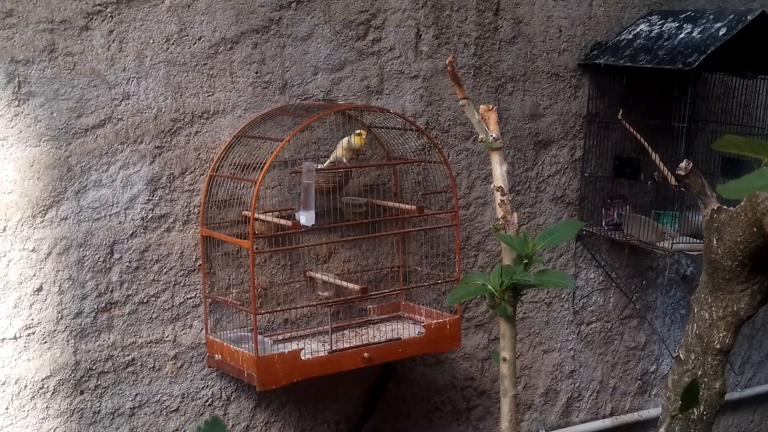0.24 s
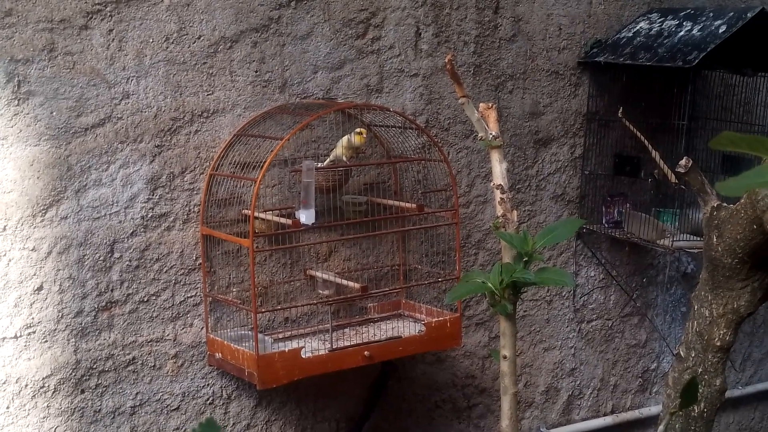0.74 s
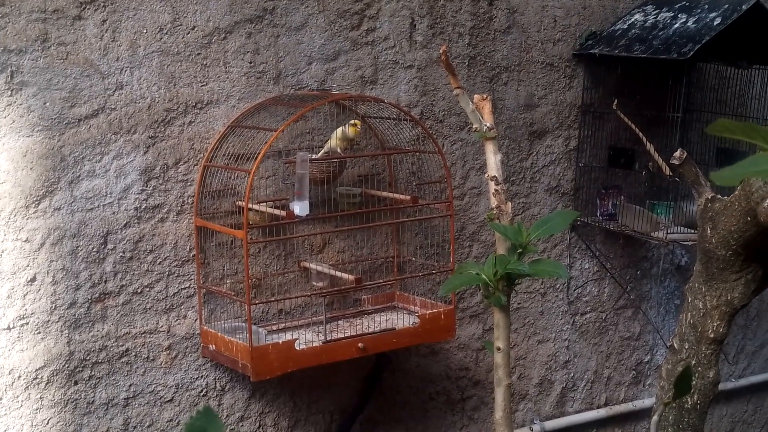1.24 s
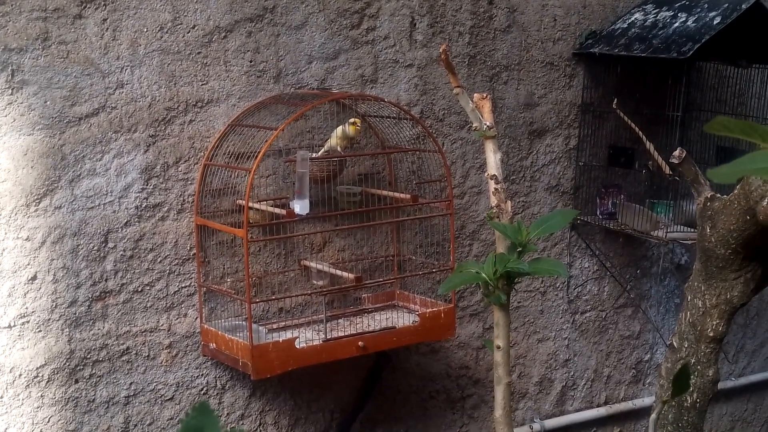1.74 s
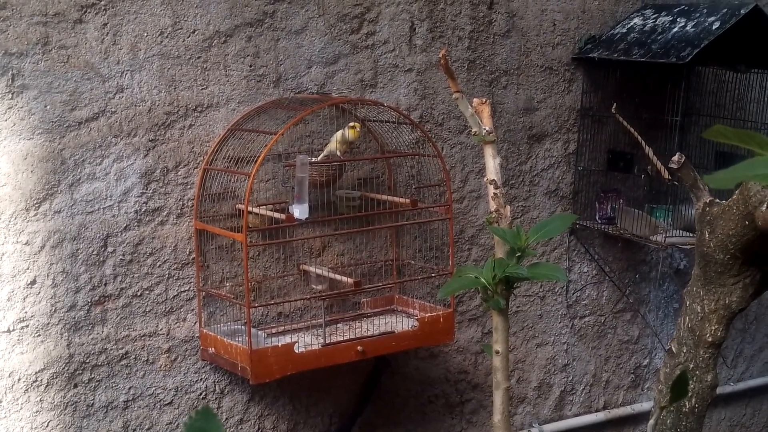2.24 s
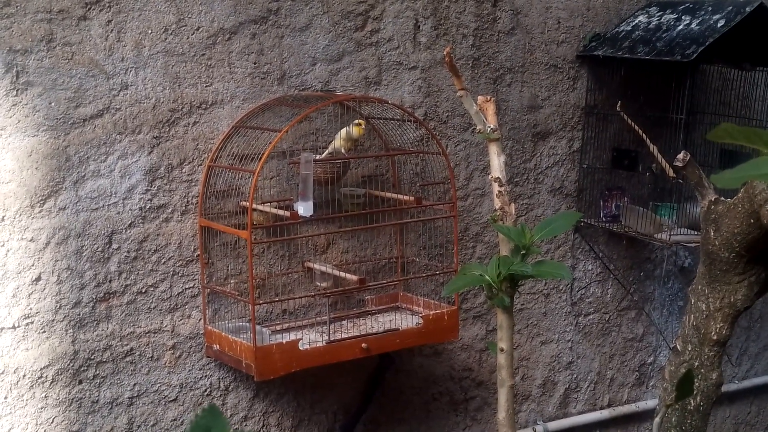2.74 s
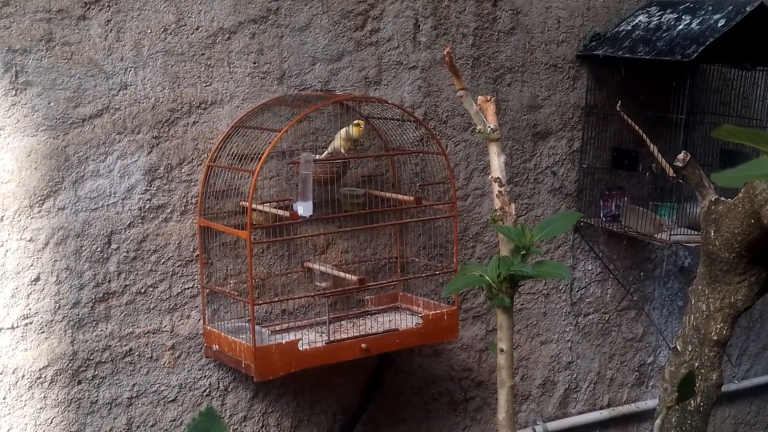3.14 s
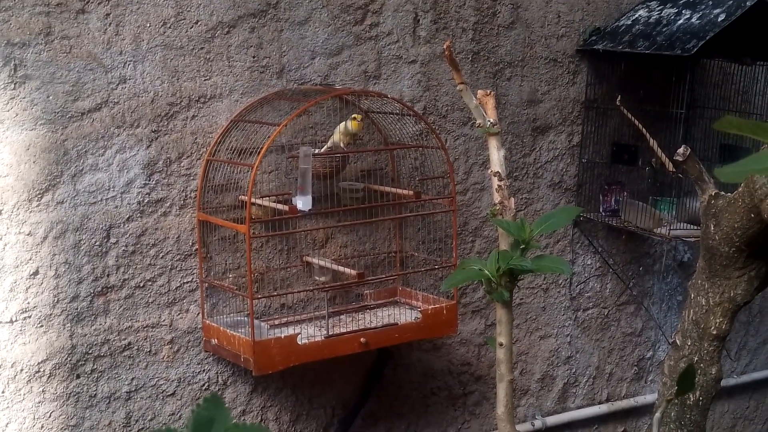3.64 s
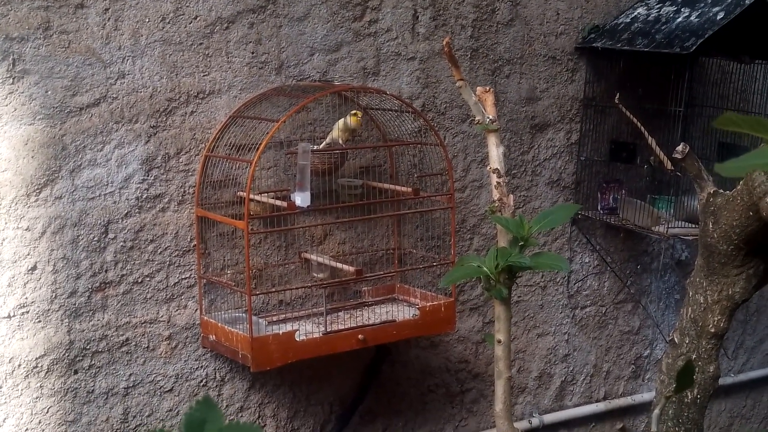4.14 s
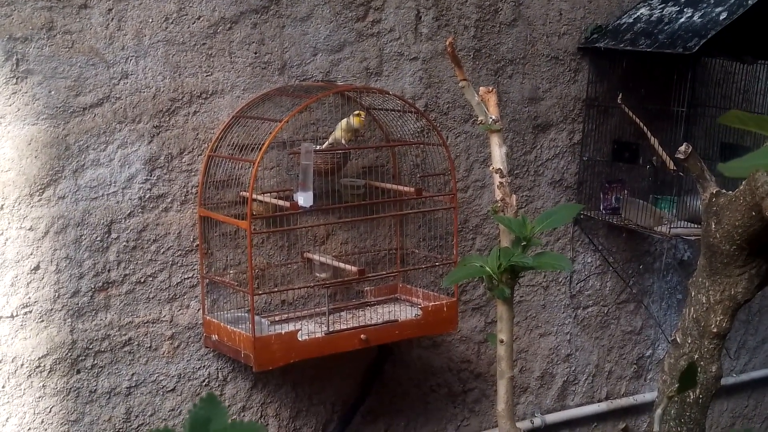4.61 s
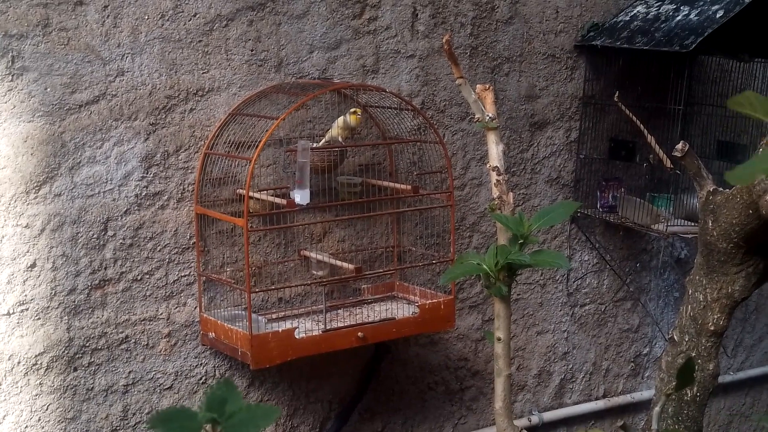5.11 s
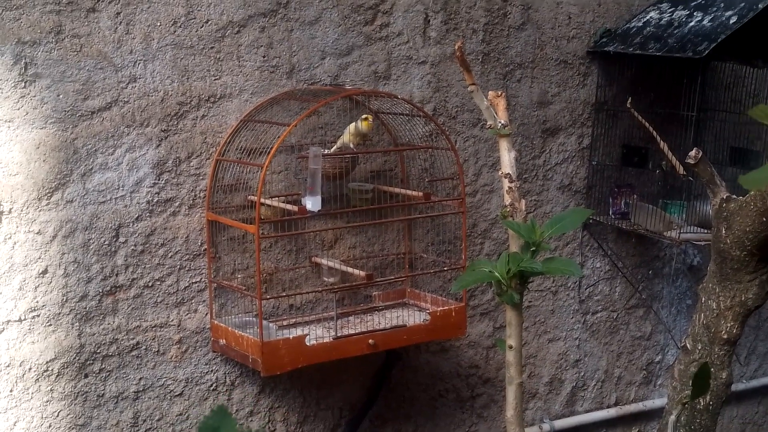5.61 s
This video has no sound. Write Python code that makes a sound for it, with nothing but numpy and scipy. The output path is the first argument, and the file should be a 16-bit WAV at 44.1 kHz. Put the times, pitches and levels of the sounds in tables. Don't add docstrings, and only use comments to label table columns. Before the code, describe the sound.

A walled yard with caged birds, heard in stereo by a small camera with uneven left and right ports. From 0 to 1 s a finch gives soft falling pips and a dry rattle, a dove coos long and low, and a far sparrow cheeps. From 1 to 2.5 s a second canary throws steep bright chirps and fading slides, with level whistles between. From 2.05 to 2.9 s the main canary clicks about seven times a second, each with a hoarse low tail. At 3.1 s it bursts into a trill of about twenty falling whistles a second, then from 3.95 s a slower roll of some eight or nine two-step drops a second. Two steep notes at 5.5 s and a falling slide at 5.7 s close it. Coos return near 1.9, 2.9, 4.2 and 5.6 s. Short wall echoes, blurred distant birdsong, town hum, street swishes and low wind taps on the right remain faint.

```python
import sys
import numpy as np
from scipy import signal
from scipy.fft import rfft, irfft, next_fast_len
from scipy.io import wavfile
from scipy.ndimage import uniform_filter1d, minimum_filter1d, map_coordinates

SR = 44100
rng = np.random.default_rng(int(sys.argv[2]) if len(sys.argv) > 2 else 0)


def invert_db(level):
    return 10 ** (np.asarray(level, dtype=float) / 20)


def wav_record(signal):
    frames = np.transpose(np.atleast_2d(signal))
    bounded = np.clip(frames, -1, 1)
    quanta = np.round(bounded * 32767).astype(np.int16)
    wavfile.write(sys.argv[1], SR, quanta)


N = 258867

# t/s, level/dB
WIND_GUSTS = [(0.0, -82.5), (0.23, -72), (0.29, -83.5), (2.39, -70), (3.35, -75.5), (3.42, -71.5),
              (4.051, -96.5), (4.46, -73), (4.56, -77), (4.9, -62), (5.03, -75.5), (5.07, -66), (5.3, -86),
              (5.49, -73), (5.56, -74.5), (5.87, -73.5)]
# t/s, peak level/dB
WIND_TAPS = [(0.696, -76), (1.316, -56.5), (1.4, -52), (1.434, -52), (1.6, -50.5), (1.826, -51.5),
             (1.955, -37), (2.201, -37), (2.256, -38.5), (2.313, -47.5), (2.363, -43.5), (2.405, -49),
             (2.532, -48.5), (2.582, -52), (2.675, -51), (2.748, -56), (3.368, -43.5), (3.466, -48.5),
             (4.429, -48), (4.773, -39.5), (4.866, -39), (4.916, -46), (5.064, -35), (5.093, -43),
             (5.472, -36.5)]
# f/Hz, level/dB
TAP_COLOUR = [(100, -7), (190, -10.5), (260, 12), (420, -1.5), (800, -19.5), (1200, -54), (3000, -59)]
# f/Hz, level/dB per Hz
BUFFET_COLOUR = [(12, -64), (20, -19), (81, -0.5), (127, -5), (166, -19), (217, -4), (265, -1),
                 (392, -12.5), (455, -25), (500, -36), (650, -84), (1100, -120)]
TOWN_COLOUR = [(120, -54), (200, -20), (242, -24.5), (474, -10), (901, -16.5), (1600, -19.5), (2030, -2),
               (2200, -9), (2860, 1), (4840, -120)]
CHATTER_COLOUR = [(940, -54), (1600, -24), (2090, -13.5), (2450, -3), (2940, -15), (3110, -9.5),
                  (4180, -17), (5610, -23.5), (6870, -28.5), (8600, -31), (10700, -35.5), (13800, -34.5),
                  (14600, -82.5)]
# middle t/s, half length/s, centre f/Hz, width/Hz, level/dB
STREET_SWISHES = [
    (0.543, 0.46, 1380, 496, -71.5),
    (2.614, 0.31, 940, 396, -70),
    (3.133, 0.039, 1570, 200, -58.5),
    (4.195, 0.096, 1010, 400, -58),
    (4.198, 0.11, 1810, 400, -48.5),
    (5.059, 0.13, 860, 410, -49.5),
    (5.197, 0.22, 1510, 200, -61),
    (5.393, 0.19, 677, 189, -65.5),
]

# t/s, length/s, start f/Hz, level/dB
SPARROW_CHEEPS = [(.0005, 0.012, 6760, -34.5), (0.008, 0.0035, 4130, -39), (0.114, .04, 6700, -47),
                  (0.976, .04, 6440, -44), (1.294, 0.05, 6000, -48), (1.557, .042, 5990, -38),
                  (1.801, 0.0087, 4910, -52), (1.987, 0.016, 3740, -48), (2.052, 0.0294, 5970, -38),
                  (3.503, .054, 7310, -34.5), (4.32, 0.021, 7890, -43), (4.78, 0.023, 7790, -36.5)]
# t/s, length/s, start f/Hz, end f/Hz, level/dB
FAR_GLIDES = [
    (1.86, 0.091, 3740, 4400, -48),
    (2.781, .14, 4270, 3820, -46),
    (3.201, 0.13, 3820, 2674, -49),
    (3.301, 0.094, 4224, 3710, -35.5),
    (3.47, 0.11, 1772, 2200, -47),
    (3.57, 0.087, 2200, 2110, -43),
    (3.45, 0.13, 3550, 2830, -47.5),
    (3.685, 0.12, 4160, 3040, -38.5),
    (3.79, 0.055, 3184, 2990, -40),
    (5.251, 0.036, 3376, 3053, -43.5),
]
# t/s, length/s, f/Hz, level/dB
FAR_HELD = [(.73, .05, 2870, -58), (2.607, 0.046, 7080, -44), (2.906, 0.034, 7030, -42.5),
            (3.521, 0.042, 625, -51.5), (3.899, 0.072, 656, -70), (4.134, 0.091, 687, -60.5),
            (4.385, 0.044, 1990, -52), (4.561, 0.043, 671, -57), (5.474, .17, 4424, -34),
            (5.664, 0.011, 6520, -36.5), (5.669, 0.012, 9420, -55), (3.06, 0.054, 3850, -46)]
# t/s, level/dB
FAR_TICK_TIMES = [(.474, -66), (.523, -63), (.572, -65), (.621, -61), (.671, -64), (.719, -66), (.766, -60),
                  (.816, -56), (.865, -63)]
# t/s, length/s, level/dB; then its pitch arc, f/Hz
SINKING_CALL = (5.061, .6, -55)
SINKING_PITCH = [785, 804, 671, 620]

# t/s, length/s, top f/Hz, share of the coo before the top, level/dB
DOVE_COOS = [
    (0.096, 0.86, 569.3, 0.68, -52),
    (1.863, 0.41, 349.3, 0.29, -50.5),
    (2.9, 0.54, 376, 0.337, -49.5),
    (4.209, 0.56, 384.5, 0.316, -49.5),
    (5.557, 0.35, 370, 0.38, -49),
]

# first t/s, gap/s, count, length/s
PIP_SERIES = [
    (.03, .07, 4, .02),
    (.758, .086, 6, .03),
]
# start f/Hz, end f/Hz
PIP_PITCH = [(2674, 1830), (2160, 1926)]
PIP_LEVEL = [-35, -42.5]
# t/s, peak level/dB; then the pitch path of a tick, f/Hz
RATTLE_TICKS = [(0.3001, -36), (0.3368, -40.5), (0.3736, -37), (0.4072, -42), (0.438, -39), (0.4754, -38),
                (0.5152, -38.5), (0.5494, -40), (0.585, -37.5), (0.6214, -39.5), (0.665, -45), (0.7, -44.5)]
RATTLE_PITCH = [2926, 1940, 1010]

# t/s, length/s, start f/Hz, end f/Hz, level/dB
CLEAR_CALLS = [
    (3.91, 0.083, 2930, 4010, -38.5),
    (4.08, 0.2, 2030, 4580, -34.5),
    (4.39, .035, 7000, 5500, -31),
    (4.435, 0.06, 4750, 3760, -36.5),
    (5.72, 0.084, 4600, 4575, -40),
]
# t/s, length/s, start f/Hz, end f/Hz, level/dB
BRIGHT_WARBLE = [
    (5.52, 0.12, 4320, 4630, -32.5),
    (5.575, 0.062, 4720, 4630, -32.5),
]
# t/s, length/s, f/Hz, level/dB
LEVEL_WHISTLES = [
    (1.339, 0.14, 2522, -36),
    (1.577, .16, 2487, -37),
    (1.848, 0.051, 2497, -37.5),
    (1.912, 0.08, 2450, -36.5),
]
# t/s, length/s, level/dB; then its pitch arc, f/Hz
HOOKED_NOTE = (.42, 0.11, -40)
HOOKED_PITCH = [5330, 6530, 6360, 6420, 5880]

# t/s, length/s, pitch f/Hz at even steps, level/dB
SECOND_CHIRPS = [
    (0.176, 0.036, [7500, 6720, 6050, 5200], -17),
    (1.273, 0.036, [8290, 6750, 6280, 4480], -10.5),
    (1.52, 0.025, [7930, 6750, 6520, 5140], -4.5),
    (1.783, 0.032, [7530, 6450, 5965, 4400], -9.5),
]
# t/s, length/s, start f/Hz, end f/Hz, level/dB
CHIRP_TRAILS = [
    (1.304, 0.037, 5750, 5140, -26),
    (1.551, .048, 6290, 4400, -32.5),
    (2.056, 0.0414, 7800, 4960, -35),
    (2.236, .034, 5400, 5130, -37),
    (.971, 0.033, 7300, 4800, -31),
    (.217, 0.0115, 4900, 3000, -27),
    (1.8, 0.051, 6200, 7200, -48),
]
# t/s, length/s, end f/Hz, level/dB
HIGH_SLIDES = [
    (.9541, 0.11, 3080, -29),
    (1.1231, 0.086, 3250, -28),
    (1.4041, 0.071, 3500, -26.5),
    (1.6787, 0.08, 3180, -29),
    (1.917, 0.059, 4490, -28),
    (2.16, .06, 3380, -31),
    (2.2754, 0.11, 2394, -30.5),
    (2.405, 0.14, 2030, -30),
]
LOW_SLIDES = [
    (2.646, .12, 4146, -30),
    (2.948, 0.22, 3710, -34),
]

# t/s, level/dB, level of the lower slide/dB
CANARY_CLICKS = [
    (2.05, -23.5, -31.5),
    (2.193, -22, -29),
    (2.334, -17.5, -27.5),
    (2.475, -20.5, -28),
    (2.619, -22, -29),
    (2.766, -20.5, -26.5),
    (2.914, -22, -27),
]
CLICK_DROP_PITCH = [4350, 3340, 2480]
# t/s, length/s, start f/Hz, end f/Hz, level/dB
LINK_NOTES = [
    (.077, .0065, 6740, 3060, -28.5),
    (.1485, .007, 6570, 3440, -28.5),
]
# t/s, length/s, level/dB; then pitch f/Hz at even steps
TRILL_NOTES = [(3.1128, 0.014, -18.5), (3.1588, 0.015, -13.5), (3.2085, 0.023, -14.5), (3.2571, 0.023, -13),
               (3.3089, 0.025, -13), (3.3596, 0.023, -10), (3.4153, .025, -10.5), (3.468, 0.023, -11),
               (3.5218, 0.023, -12), (3.573, 0.023, -14), (3.6242, .025, -15.5), (3.6781, 0.026, -14),
               (3.7344, 0.023, -14), (3.787, 0.03, -12.5)]
TRILL_PITCH = [7320, 5960, 4800, 3760]
# t/s, length/s, level/dB; then pitch f/Hz at even steps
LEAD_NOTE = [
    (3.8444, 0.06, -15),
]
LEAD_PITCH = [7695, 6450, 5670, 4220]
# t/s, time to shoulder/ms, to knee/ms, to last bead/ms, level/dB
ROLL_NOTES = [(3.9487, 30, 50.8, 59, -11.5), (4.067, 32, 52.7, 67, -13), (4.1997, 23, 47.6, 57, -13.5),
              (4.331, 22, 42, 54, -14.5), (4.439, 31, 49.3, 64, -12.5), (4.5508, 28.5, 50.7, 58.7, -12.5),
              (4.67, 29, 53, 64, -11.5), (4.7826, 25.3, 46.8, 65, -11), (4.9, 26.2, 45, 61.6, -11),
              (5.018, 30.5, 45.3, 60.7, -12), (5.136, 27.3, 51.4, 63, -11.5), (5.261, 26.2, 46, 55, -10.5),
              (5.3814, 29.7, 50.6, 61.4, -12.5)]
ROLL_FACING = [0, 5, -5.5, -1, 2.5, 4, 3.5, -4, -11, 1, -4, -3.5, -1.5]
ROLL_PITCH = [8190, 6520, 6120, 5640, 5107, 4736, 3850, 2575]
# t/s, length/s, level/dB; then pitch f/Hz at even steps
END_NOTES = [
    (5.504, .042, -16.5),
    (5.576, 0.036, -17.5),
]
END_PITCH = [7500, 5500, 4580, 3570]
# t/s, length/s, pitch f/Hz at even steps, level/dB, rise share, fall share
CLOSING_SLIDE = [
    (5.676, 0.069, [4600, 3950, 2700], -16.5, 0.42, 0.72),
    (5.722, 0.13, [3600, 2700, 2100], -31, 0.048, 0.43),
]
# pitch f/Hz, level/dB
BEAK_COLOUR = [(600, -2.5), (2000, 2), (3000, 2.5), (4000, 4.5), (5000, 5), (6100, 4.5), (6700, -5),
               (7600, 6), (8300, 16)]

# f/Hz, level/dB
CAGE_PATH_LEFT = [(2000, -13), (3300, -14), (3900, -1.5), (4400, -42), (4900, 2), (5150, 0.5), (5400, -10),
                  (5750, -3), (6100, -7), (6400, -11), (6750, -14), (7400, -18), (8300, -2), (9500, -1.5),
                  (14000, -10)]
CAGE_PATH_RIGHT = [(2000, -21), (3300, -8), (4000, -38.5), (4400, -15.5), (4900, -2), (5400, -13),
                   (5900, -6.5), (6300, -16.5), (6650, -6), (7000, -17.5), (7700, -13.5), (8400, -12.5),
                   (9500, -8.5), (14000, -11)]
ECHO_DELAYS = [(.002468, .002224), (.004724, .00382), (.00641, .00775), (.00848, .009424)]
ECHO_LEVELS = [(-16.5, -1.5), (-29, -9.5), (-29, -47), (-17.5, -11)]
# f/Hz, t60/s
YARD_T60 = [(300, 0.44), (2500, 0.46), (6000, 0.33), (8000, 0.4), (9500, 0.38), (14000, 0.24)]
# f/Hz, level/dB
YARD_COLOUR = [(300, 1), (2000, -2), (3300, 3), (4400, -3), (5100, 0.5), (5900, -0.5), (6700, -1),
               (7800, 0.5), (8700, -2.5), (10500, 2.5), (14000, 0)]
# f/Hz, level/dB
LEFT_PORT = [(60, -14), (210, -25.5), (330, -5), (760, 0.5), (1800, -9), (4200, -8.5), (6100, 0.5),
             (7500, 0), (8050, 1), (8450, -18), (9500, -28.5), (13000, -11.5), (14300, -3), (15000, -29)]
RIGHT_PORT = [(60, -2.5), (760, 1), (1800, -20.5), (4100, -15.5), (5200, -11.5), (6300, -19.5), (7500, -7),
              (8200, -8), (8800, -2.5), (9600, 4.5), (11000, -0.5), (11600, -7), (12300, -11), (13000, -12),
              (14300, -8), (15000, -38)]


def unit(x):
    return x / np.sqrt(np.mean(x ** 2) + 1e-20)


def along(points, hz):
    f, v = np.transpose(points)
    return np.interp(np.log(hz + 1), np.log(f + 1), v)


def wobble(rate):
    knots = rng.standard_normal(int(N * rate / SR) + 4)
    return map_coordinates(knots, [np.arange(N) * rate / SR])


def filtered(x, response):
    m = next_fast_len(N + 8192)
    return irfft(rfft(x, m) * response(np.fft.rfftfreq(m, 1 / SR)), m)[..., :N]


def coloured_noise(shape, colour):
    return filtered(rng.standard_normal(shape), lambda hz: invert_db(along(colour, hz)))


def patchy(x, patchy_db):
    z = signal.stft(x, nperseg=512)[2]
    field = uniform_filter1d(rng.standard_normal(z.shape[1:]), size=5, axis=0)
    field = uniform_filter1d(field, size=12, axis=1)
    return unit(signal.istft(z * invert_db(patchy_db * unit(field)), nperseg=512)[1][:, :N])


def add(track, s, length, hz, db, overtone_db=-30, rise=0.058, fall=0.064, husky=0.49, bump=(6000, 0)):
    u = np.linspace(0, 1, round(length * SR))
    if callable(hz):
        pitch = hz(u * length)
    else:
        pitch = np.polyval(np.polyfit(np.linspace(0, 1, len(hz)), hz, len(hz) - 1), u)
    phase = 2 * np.pi * (np.cumsum(pitch) / SR + rng.random())
    swell = np.sin(np.pi / 2 * np.clip(np.minimum(u / rise, (1 - u) / fall), 0, 1)) ** 2
    third = invert_db(-2.5) * np.sin(3 * phase) * (pitch < SR / 8)
    husk = np.repeat(rng.standard_normal(len(u) // 30 + 1), 30)[:len(u)]
    overtones = (np.sin(2 * phase) + third) * (1 - husky / 2 + husky * husk)
    tone = np.sin(phase) + invert_db(overtone_db) * overtones
    bump_hz, bump_db = bump
    beak_db = along(BEAK_COLOUR, pitch) + bump_db * np.exp(-((pitch - bump_hz) / 350) ** 2)
    part = track[round(s * SR):][:len(u)]
    part += (invert_db(db + beak_db) * swell * tone)[:len(part)]


def whistles(rows, bow, **voice):
    track = np.zeros(N)
    for s, length, start, end, db in rows:
        add(track, s, length, [start, start + bow * (end - start), end], db, **voice)
    return track


def air():
    t = np.arange(N) / SR
    gust_s, wind_db = np.transpose(WIND_GUSTS)
    low = coloured_noise((2, N), BUFFET_COLOUR)
    lumps = invert_db(3.5 * np.array([wobble(16), wobble(16)]))
    buffet = invert_db(np.interp(t, gust_s, wind_db) + 18.0) * unit(low * lumps)

    hum = coloured_noise((2, N), TOWN_COLOUR)
    town_db = -75.5 + 2.5 * t + 11.5 + 1.3 * wobble(6)
    town = invert_db(town_db) * patchy(hum, patchy_db=6)

    puffs = np.zeros(N)
    for s, db in WIND_TAPS:
        near = slice(round((s - .03) * SR), round((s + .05) * SR))
        puffs[near] += invert_db(db) * np.exp(-.5 * ((t[near] - s - .008) / 0.0046) ** 2)
    taps = unit(coloured_noise(N, TAP_COLOUR)) * puffs

    wash = coloured_noise((2, N), CHATTER_COLOUR)
    chatter = invert_db(-55.0 + 0.77 * wobble(4.6)) * patchy(wash, patchy_db=7.0)
    return buffet + town + chatter + invert_db([[-15], [3]]) * taps


def street():
    out, t = np.zeros((2, N)), np.arange(N) / SR
    for s, half, centre_hz, width_hz, db in STREET_SWISHES:
        span = np.abs(t - s) < 3 * half
        band_hz = [centre_hz - width_hz / 2, centre_hz + width_hz / 2]
        sos = signal.butter(3, band_hz, "band", fs=SR, output="sos")
        hiss = unit(signal.sosfilt(sos, rng.standard_normal((2, span.sum()))))
        out[:, span] += invert_db(db) * np.exp(-((t[span] - s) / half) ** 2) * hiss
    return out


def far_birds():
    cheeps = [(s, n, hz, hz * (1 - .14), db) for s, n, hz, db in SPARROW_CHEEPS]
    held = [(s, n, hz, hz, db) for s, n, hz, db in FAR_HELD]
    track = whistles(cheeps, bow=0.64, overtone_db=-34.0)
    track += whistles(FAR_GLIDES + held, bow=.7, overtone_db=-53.5)
    for s, db in FAR_TICK_TIMES:
        add(track, s, .008, [5900, 4900], db)
    s, length, db = SINKING_CALL
    add(track, s, length, SINKING_PITCH, db)
    return track


def dove():
    rest_hz = 315.9
    track, t = np.zeros(N), np.arange(N) / SR
    waver_hz = 7 * wobble(25)
    for s, length, top_hz, top, db in DOVE_COOS:
        u = np.clip((t - s) / length, 0, 1)
        arch = np.sin(np.pi / 2 * np.minimum(u / top, (1 - u) / (1 - top))) ** 1.1
        lift_hz = (top_hz - rest_hz) * arch
        catch_db = 11 * np.exp(-((u - 0.91 * top) / 0.23) ** 2)
        thin_db = 21 * (lift_hz / 224) ** 2
        fade = np.clip(np.minimum(u, 1 - u) * length / 0.018, 0, 1)
        phase = 2 * np.pi * np.cumsum(rest_hz + lift_hz + waver_hz) / SR
        tone = np.sin(phase) + invert_db(-40) * np.sin(2 * phase)
        track += fade * invert_db(db + 7.0 - thin_db - catch_db + 0.5 * u) * tone
    return track * invert_db(3.26 * wobble(30) - 1)


def finch():
    track = np.zeros(N)
    for (s, gap, count, length), hz, db in zip(PIP_SERIES, PIP_PITCH, PIP_LEVEL):
        for k in range(count):
            when = s + k * gap + rng.normal(0, .0015)
            pip_db = db - .045 * k * k + rng.normal(0, 2)
            add(track, when, length, hz, pip_db, overtone_db=-40, rise=.2, fall=.85)
    half_s = .011
    for s, peak_db in RATTLE_TICKS:
        start, db = s - .003, peak_db + 9.5
        add(track, start, half_s, RATTLE_PITCH[:2], db, overtone_db=-44, rise=0.49, fall=0.24)
        add(track, start + half_s, half_s, RATTLE_PITCH[1:], db - 28, overtone_db=-50, rise=0.26, fall=0.41)
    return track


def next_cage():
    track = whistles(CLEAR_CALLS, bow=.72, overtone_db=-27.5, rise=0.32, fall=0.12)
    track += whistles(BRIGHT_WARBLE, bow=0.59, overtone_db=-26, husky=0.65)
    s, length, db = HOOKED_NOTE
    add(track, s, length, HOOKED_PITCH, db, rise=0.28, fall=0.25)
    track = track * (1 + .5 * wobble(170))
    arch_hz = 71 * np.array([-1.1, .3, -.3])
    for s, length, hz, db in LEVEL_WHISTLES:
        for k in (-1, 0, 1.2, 2):
            tone_db = db - 28.5 * (k != 0) + rng.normal(0, 3.1)
            add(track, s, length, hz + k * 616 + arch_hz, tone_db, rise=0.078, fall=0.22)
    return track * (1 + .22 * wobble(60))


def neighbour():
    voice = dict(overtone_db=-33, bump=(5550, 5))
    high = [(s, n, 7290, end, db) for s, n, end, db in HIGH_SLIDES]
    low = [(s, n, 5780, end, db) for s, n, end, db in LOW_SLIDES]
    track = whistles(high, bow=.47, rise=.06, fall=.6, **voice)
    track += whistles(low, bow=.52, rise=.1, fall=.4, **voice)
    track += whistles(CHIRP_TRAILS, bow=0.44, rise=0.24, fall=0.47)
    track = track * (1 + .55 * wobble(300))
    for chirp in SECOND_CHIRPS:
        add(track, *chirp, overtone_db=-30.5, rise=0.4, fall=0.27)
    return track


def click_slides():
    delay_s, drop_s = .0225, .0067
    track = np.zeros(N)
    for s, _, db in CANARY_CLICKS:
        add(track, s + delay_s + drop_s, .028, [2650, 2400, 2150], db - 0.5, rise=0.18, fall=0.28)
    track = track * (1 + .8 * wobble(600))
    for s, _, db in CANARY_CLICKS:
        add(track, s + delay_s, drop_s, CLICK_DROP_PITCH, db + 7, rise=0.35, fall=0.41)
    return track


def closing():
    track = np.zeros(N)
    for *note, rise, fall in CLOSING_SLIDE:
        add(track, *note, overtone_db=-37.5, rise=rise, fall=fall)
    return track


def roll():
    step_s, drop_s = 0.0093, 0.0049
    track = np.zeros(N)
    for (s, *ms, db), facing_db in zip(ROLL_NOTES, ROLL_FACING):
        top, knee, bead = np.array(ms) / 1000
        when = [0, top - step_s, top, knee - step_s, knee, knee + drop_s, bead, bead + step_s]

        def arc(t):
            return uniform_filter1d(np.interp(t, when, ROLL_PITCH), size=150, mode="nearest")

        add(track, s, when[-1], arc, db, overtone_db=-32, rise=0.35, fall=0.18, bump=(ROLL_PITCH[2], facing_db))
    return track


def canary():
    track = whistles(LINK_NOTES, bow=0.59, overtone_db=-25.0)
    for rows, hz in (TRILL_NOTES, TRILL_PITCH), (END_NOTES, END_PITCH), (LEAD_NOTE, LEAD_PITCH):
        for s, length, db in rows:
            add(track, s, length, hz, db, overtone_db=-31, rise=0.09, fall=0.12)
    for s, db, _ in CANARY_CLICKS:
        add(track, s, .007, [7000, 5200, 3000], db)
    return track + roll()


def cage_paths(x):
    return filtered(x, lambda hz: invert_db([along(CAGE_PATH_LEFT, hz), along(CAGE_PATH_RIGHT, hz)]))


def walls(x):
    delay_s = np.array(ECHO_DELAYS)[..., None]
    gain = invert_db(ECHO_LEVELS)[..., None]
    return filtered(x, lambda hz: 1 + np.sum(gain * np.exp(-2j * np.pi * hz * delay_s), axis=0))


def yard(x, wet_db, early_db, span=.55):
    out, hop = np.zeros((2, N)), round(span * SR)
    for start in range(0, N, hop):
        hz, t, z = signal.stft(rng.standard_normal((2, SR // 2)), SR, nperseg=256)
        slow = invert_db(-60 * t / along(YARD_T60, hz)[:, None])
        quick = invert_db(early_db - 60 * t / 0.14)
        colour = invert_db(along(YARD_COLOUR, hz))[:, None]
        tail = signal.istft(z * (slow + quick) * colour, SR, nperseg=256)[1]
        wet = signal.fftconvolve(x[None, start:start + hop], tail / np.linalg.norm(tail[0]), axes=1)
        part = out[:, start + 100:start + 100 + wet.shape[1]]
        part += invert_db(wet_db) * wet[:, :part.shape[1]]
    return out


def scene():
    near, far, coo = canary(), neighbour() + click_slides(), dove()
    rest = far_birds() * (1 + .6 * wobble(700))
    clear = closing() + finch() + next_cage()
    caged = cage_paths(near + invert_db(-5.0) * far)
    straight = walls(caged + invert_db(-5.5) * rest + invert_db(-1.1) * coo + invert_db(-0.8) * clear)
    tails = yard(near, wet_db=-10.5, early_db=4.0)
    tails += yard(far, wet_db=-9.0, early_db=0.5)
    tails += yard(coo, wet_db=-1.5, early_db=-6.0, span=2.1)
    tails += yard(rest, wet_db=3, early_db=5)
    tails += yard(clear, wet_db=-4.5, early_db=9)
    return straight + tails + air() + street()


def ports(x):
    def response(hz):
        lag = np.exp(-2j * np.pi * hz * 0.0002846)
        return np.array([invert_db(along(LEFT_PORT, hz)) * lag, invert_db(along(RIGHT_PORT, hz))])

    return filtered(x, response)


def thinned(x, near_db, frame_db, size=12):
    z = signal.stft(x, nperseg=1024)[2]
    bands = z[:, :504].reshape(2, -1, size, z.shape[-1])
    level = 10 * np.log10(np.mean(np.abs(bands) ** 2, axis=2) + 1e-14)
    below = -minimum_filter1d(-level, size=5, axis=1, origin=2)
    bar = np.maximum(below + near_db, level.max(axis=1, keepdims=True) + frame_db)
    luck = 2 * uniform_filter1d(rng.normal(0, 6, level.shape), size=5, axis=2)
    keep = level + luck > bar
    keep[:, :9] = True
    z[:, :504] = (bands * np.where(keep, 1, .03)[:, :, None]).reshape(2, 504, -1)
    return signal.istft(z, nperseg=1024)[1][:, :N]


def roll_off(x):
    return signal.sosfilt(signal.butter(12, 15320, fs=SR, output="sos"), x)


def record(dry):
    mix = thinned(ports(dry), near_db=-23.5, frame_db=-40.5)
    return roll_off(mix)


dry = scene()
out = record(dry)
wav_record(out)
```